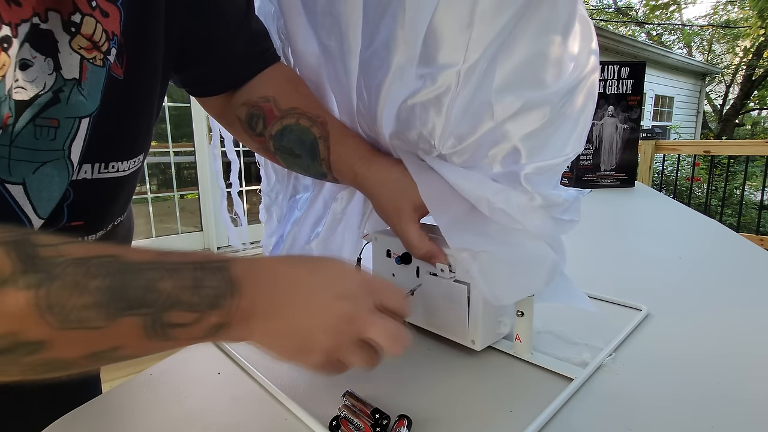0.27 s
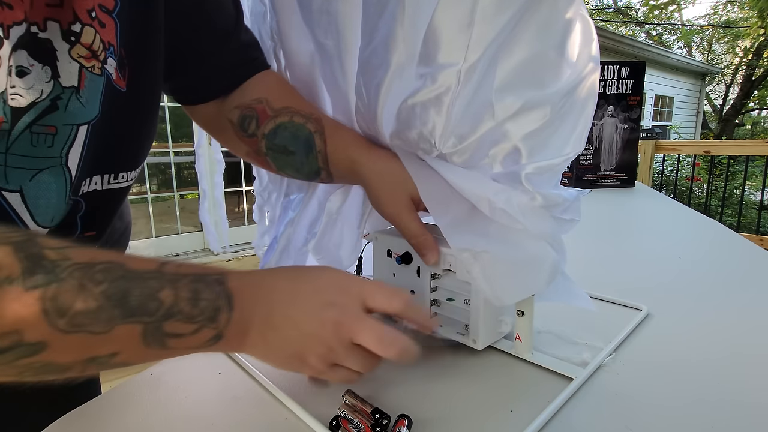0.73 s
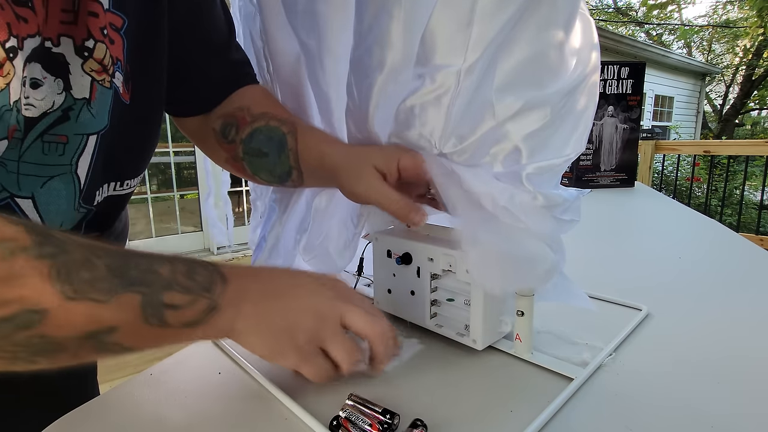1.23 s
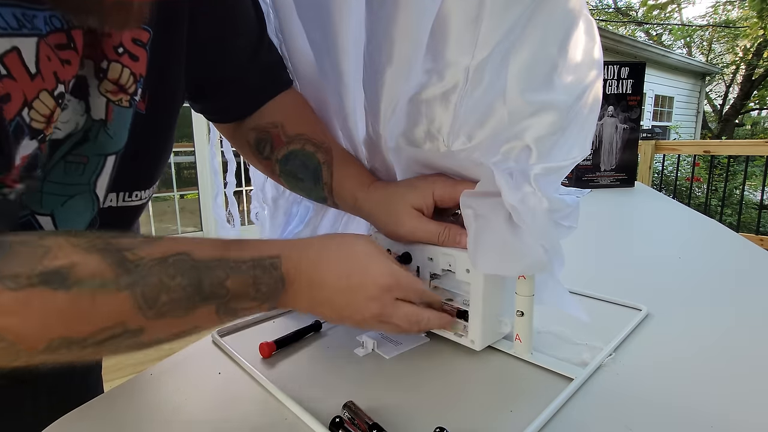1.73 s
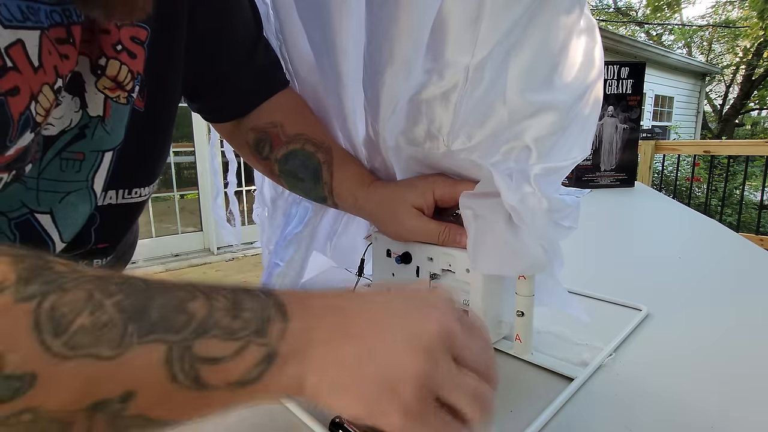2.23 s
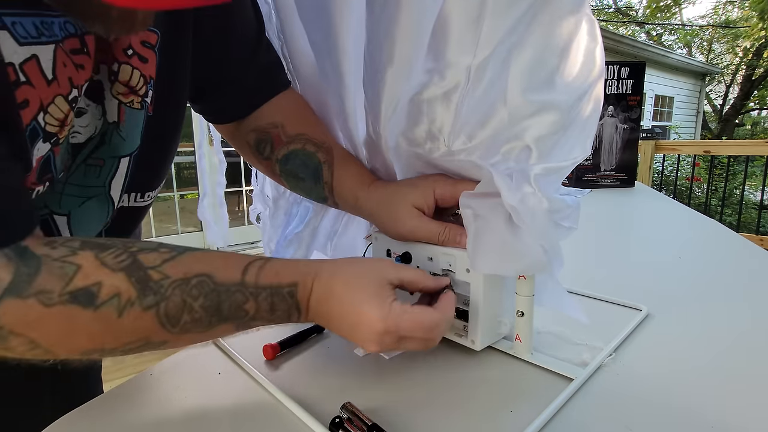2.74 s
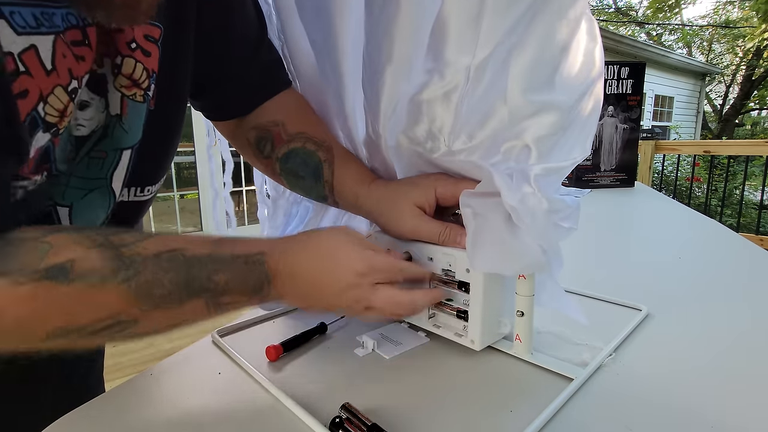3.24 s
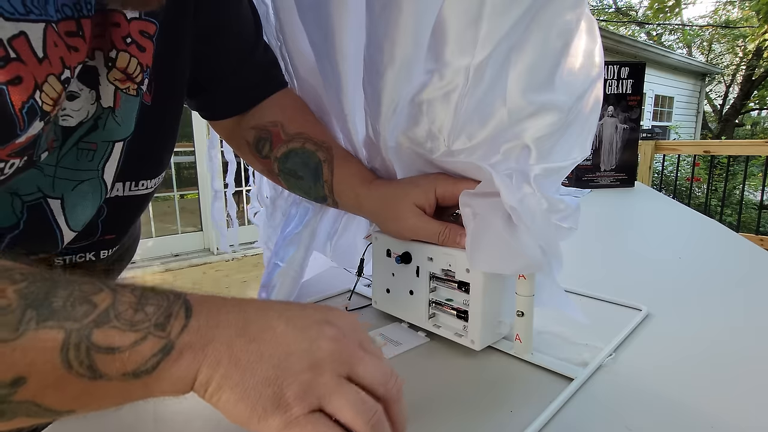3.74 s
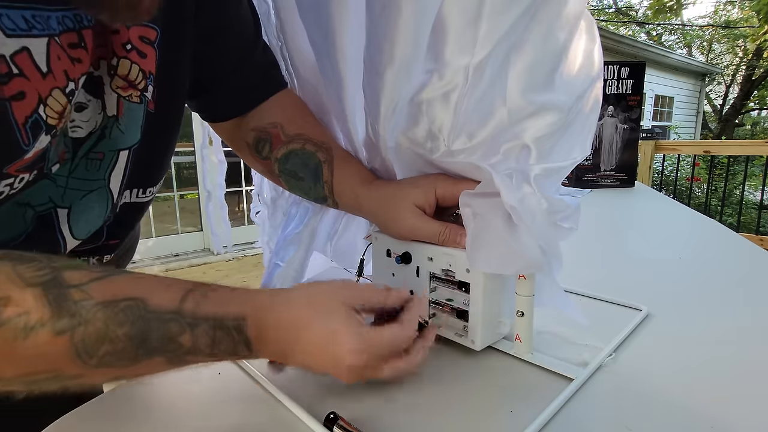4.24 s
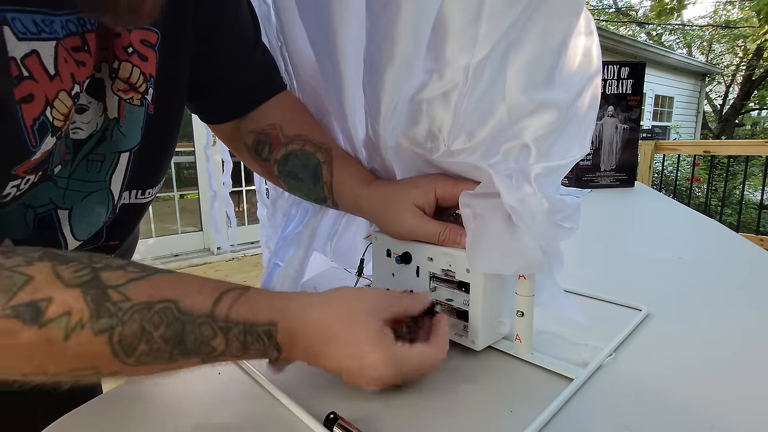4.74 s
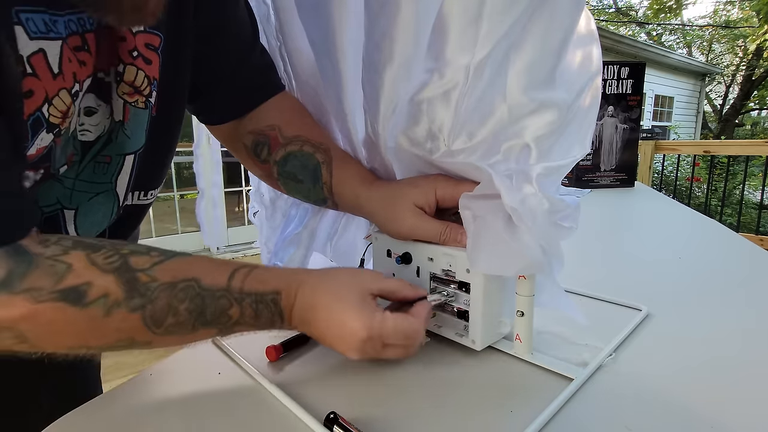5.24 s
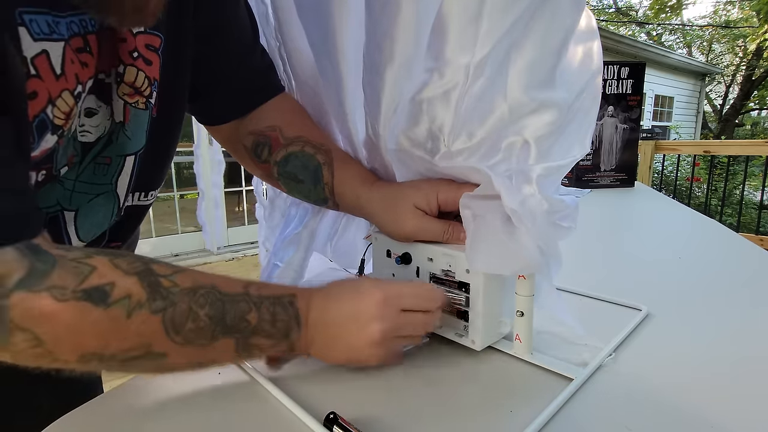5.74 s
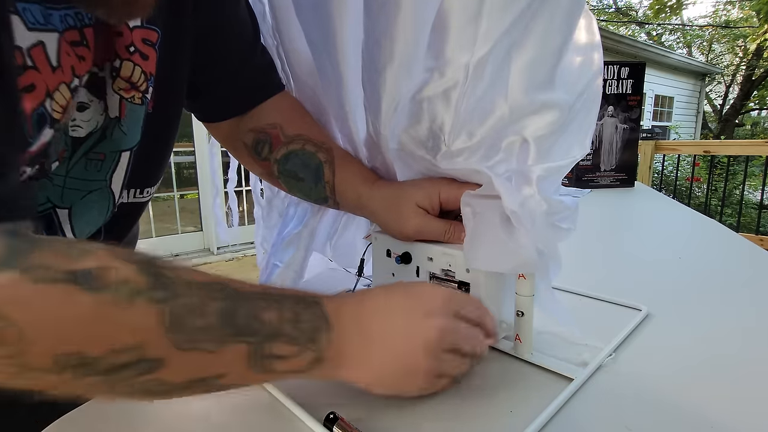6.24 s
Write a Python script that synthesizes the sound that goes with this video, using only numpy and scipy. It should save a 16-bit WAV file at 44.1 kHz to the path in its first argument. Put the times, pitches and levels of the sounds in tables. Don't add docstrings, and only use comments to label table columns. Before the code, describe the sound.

A plastic battery cover snaps off and clatters onto an outdoor table, then cells click into a hollow box over insects and faint traffic rumble.

```python
import sys
import numpy as np
from scipy import signal
from scipy.fft import rfft, irfft, next_fast_len
from scipy.io import wavfile
from scipy.ndimage import uniform_filter1d

SR = 44100
rng = np.random.default_rng(int(sys.argv[2]) if len(sys.argv) > 2 else 0)


def materialize(psi):
    bounded = np.clip(np.atleast_2d(psi).T, -1, 1)
    quanta = np.round(bounded * 32767).astype(np.int16)
    wavfile.write(sys.argv[1], SR, quanta)


def boost(x):
    u = np.asarray(x, float) / 20
    return 10 ** u


N = 285900
PADDED = next_fast_len(N)

# (time [s], level [dB])
TRAFFIC_LEVEL = [
    (0.0, -38.5),
    (1.2, -39.5),
    (2.6, -41.5),
    (4.2, -42),
    (5.6, -39.5),
    (6.48, -34),
]
# (frequency [Hz], density [dB per Hz])
TRAFFIC_SPECTRUM = [(15, -54), (25, -19), (32, -11.5), (40, -17), (50, -5.5), (65, -2), (81, -2.5),
                    (140, -18.5), (180, -60), (310, -120)]
# (frequency [Hz], density [dB per Hz])
TOWN_SPECTRUM = [(59, -46), (100, -3.5), (181, -10.5), (240, -14.5), (323, -15.5), (390, -14.5), (470, -18),
                 (533, -14.5), (1590, -22), (1830, -26), (4200, -34), (5460, -66), (9240, -120)]
# (frequency [Hz], density [dB per Hz])
INSECT_SPECTRUM = [(2350, -41), (4000, -18.5), (4290, -16.5), (4630, -4), (5110, 1), (5840, -10),
                   (6320, -4.5), (7350, -7.5), (8300, -30.5), (10800, -62), (18300, -120)]
# (frequency [Hz], density [dB per Hz])
HISS_SPECTRUM = [(4710, -11), (8000, -16), (10000, -7), (11600, -9.5), (12400, -2.5), (15100, -2.5),
                 (15800, -1), (16150, -26)]
# (frequency [Hz], correlation [-1..1])
PORT_LIKENESS = [(30, 0.3), (65, 0.5), (130, 0.95), (290, 0.48), (640, -0.45), (1410, -0.67), (3100, 0.05),
                 (15000, -0.03)]
# (frequency [Hz], left minus right [dB])
PORT_BALANCE = [(60, -4), (110, -1.5), (200, -1.5), (380, -6.5), (700, -1), (1290, -2.5), (2380, -0.5),
                (4400, -2.5), (8120, 1.5), (15000, -8.5)]
# (frequency [Hz], left lead [rad])
COVER_PHASE = [(0, 0), (860, 1.9), (2070, -0.8), (4220, -0.1), (5170, -1.5), (6980, 9.5), (10900, 22.6),
               (13400, 20.2), (15000, 7.9), (15900, 8.4)]
# (frequency [Hz], left lead [rad])
BOX_PHASE = [(0, 0), (600, 0.8), (2240, -7.4), (3880, -6.8), (4820, -8.5), (7150, -1.1), (8700, -3.5),
             (10700, -3.1), (13100, -2.8), (15900, -5.9)]
TOWN_DB, INSECT_DB, HISS_DB = -46.5, -50, -59.5

# (frequency [Hz], level [dB], t60 [s])
BOX_MODES = [(385, 4.5, 0.23), (424, -11, 0.16), (481, 4, 0.08), (534, 8.5, 0.15), (617, 17.5, 0.074),
             (660, 7, 0.16), (717, -4, 0.45)]
# (frequency [Hz], level [dB], t60 [s])
TABLE_MODES = [(133.5, -6.5, 0.48), (169.4, -0.5, 0.38), (213.6, -23, 0.42), (233.9, 3.5, 0.42),
               (244.3, -7.5, 0.45), (302, -17.5, 0.08)]
# (frequency [Hz], level [dB], t60 [s])
SHELL_MODES = [(945, -4, .045), (1105, -1, .05), (1215, -3, .04), (1390, 1, .035), (1540, 2, .03),
               (1710, 0, .04), (1845, -4, .04), (2050, -4, .035), (2320, -6, .04), (2630, -8, .04),
               (2880, -8, .04)]
# (frequency [Hz], level [dB], t60 [s])
TAB_MODES = [(3500, 9, 0.015), (3340, -15, 0.024), (3466, 27, 0.043), (4610, -40, .035), (4460, 11, 0.0032),
             (4950, -18, 0.007), (5930, 5, 0.01), (6700, 39, 0.027), (8700, -32.5, 0.02)]
# (frequency [Hz], level [dB], t60 [s])
EDGE_MODES = [(8600, -5, .008), (11000, -7, .008), (12700, 0, .012), (14000, -1, .008), (15200, 0, .008)]

# (time [s], box level [dB], box mode [Hz], table level [dB], contact [ms])
COVER_KNOCK_EVENTS = [(0.044, -20, 546, -48, 7.1), (0.187, -28.5, 710, -38.5, 26),
                      (0.318, -12, 420, -18.5, 1.3), (0.343, -23, 385, -18, 1.36),
                      (0.371, -21.5, 666, -22, 23.6), (0.63, -44, 620, -34, 4.9),
                      (0.672, -14.5, 610, -17, 12.6), (0.682, -24, 390, -43, 5.3),
                      (0.699, -22.5, 373, -26, 13), (0.736, -23, 610, -28.5, 11), (0.802, -47, 640, -49, 3),
                      (0.93, -34.5, 665, -28.5, 14), (1.006, -33, 744, -29.5, 1.4),
                      (1.1, -39, 750, -33, 6.7), (1.161, -16.5, 650, -31.5, 11)]
# (time [s], box level [dB], box mode [Hz], table level [dB], contact [ms])
CELL_KNOCK_EVENTS = [(1.68, -10.5, 620, -49, 6.7), (1.685, -10, 410, -27.5, 3.5),
                     (2.242, -32.5, 497, -30, 30), (2.804, -33.5, 655, -38.5, 3.7),
                     (2.882, -24.5, 543, -24.5, 5.7), (2.898, -33, 616, -29.5, 23),
                     (2.957, -24, 630, -30, 3.7), (3.033, -9.5, 590, -30, 8.3),
                     (3.049, -12.5, 374, -27, 3.6), (3.074, -24, 510, -41, 15),
                     (3.195, -9.5, 613, -44, 3.6), (3.207, -19, 635, -25.5, 2.9),
                     (4.871, -40, 433, -31, 10.3), (5.152, -29.5, 398, -25.5, 12.5),
                     (5.25, -29.5, 560, -39.5, 14), (5.409, -26, 420, -29, 3.45),
                     (5.507, -33, 687, -61, 5.9), (5.727, -24.5, 610, -60, 3.9),
                     (5.809, -23, 584, -26, 2.8), (5.829, -22.5, 616, -30.5, 4),
                     (5.868, -18, 630, -39, 1.2), (5.884, -22.5, 700, -30, 15),
                     (6.03, -26.5, 715, -39, 5.6), (6.153, -13.5, 692, -25.5, 3.95)]
# (from [s], to [s])
HAND_RESTS = [
    (0.33, 0.65),
    (0.9, 1.6),
    (2.2, 2.3),
    (4.8, 4.9),
]
HAND_ON_TABLE_HZ, COVER_ON_TABLE_HZ, BOX_ON_TABLE_HZ = 127.4, 197, 248
COVER_OFF_S, TABLE_LAG_S = 1.6, 0.00565

# (time [s], shell level [dB], struck spot [Hz], tabs level [dB], edge level [dB])
COVER_CLICK_EVENTS = [(0.046, -16.5, 1890, -21.5, -29), (0.188, -34.5, 1610, -34, -33.5),
                      (0.3188, -6, 1200, -5, -5.5), (0.323, -16.5, 1830, -11, -30),
                      (0.3317, -14.5, 1750, -11, -18.5), (0.3701, -15, 1550, -17, -23),
                      (0.383, -19.5, 1610, -27, -35), (0.631, -27.5, 1210, -54, -47.5),
                      (0.6719, -10, 1050, -19.5, -30), (0.6805, -12, 970, -9, -19),
                      (0.7022, -23.5, 2090, -35, -62.5), (0.736, -20, 1350, -18.5, -38),
                      (0.7603, -30, 1050, -38, -60), (0.8043, -29, 1740, -21, -22),
                      (0.8613, -45, 1370, -50, -45.5), (0.933, -15.5, 1370, -11.5, -8.5),
                      (1.0071, -22, 2660, -21.5, -23.5), (1.017, -36, 2940, -43, -30),
                      (1.033, -32, 2700, -32, -48), (1.1037, -22, 1810, -23, -26),
                      (1.133, -35, 2900, -36, -38), (1.1398, -25.5, 2880, -25.5, -55),
                      (1.149, -27, 3040, -33, -31), (1.1626, -15.5, 1210, -8.5, -9.5),
                      (1.432, -38, 2850, -38, -32.5), (1.4377, -39.5, 1190, -38.5, -47.5)]
# (time [s], shell level [dB], struck spot [Hz], tabs level [dB], edge level [dB])
CELL_CLICK_EVENTS = [(1.6806, -1.5, 1175, -15.5, -14), (1.766, -41, 1660, -42, -62),
                     (1.786, -40, 1060, -41, -41.5), (2.242, -43, 1160, -36, -63),
                     (2.249, -32, 1010, -45, -58), (2.269, -39.5, 1020, -55, -62),
                     (2.882, -39, 1310, -45, -49), (2.959, -32, 1160, -32, -45),
                     (3.0357, -22, 1280, -34, -32), (3.042, -18, 1360, -34, -36),
                     (3.071, -27, 1160, -49, -55), (3.1942, -3, 1215, -12.5, -17),
                     (3.262, -41.5, 1350, -39.5, -47), (5.1515, -45, 1120, -51, -67),
                     (5.216, -52, 2470, -38, -54), (5.247, -30.5, 2450, -23, -30),
                     (5.3133, -43.5, 2970, -41.5, -74), (5.4083, -24, 1180, -42, -48.5),
                     (5.507, -32.5, 1710, -45, -51), (5.7265, -40, 1140, -58, -63),
                     (5.757, -52, 1200, -58, -65), (5.808, -35, 1130, -52, -72),
                     (5.846, -26, 1570, -48, -36), (5.8665, -14.5, 1600, -29.5, -49),
                     (5.944, -20.5, 2740, -10.5, -14.5), (5.957, -52, 2800, -39, -44),
                     (6.0302, -21.5, 2370, -30.5, -53), (6.153, -7, 1460, -20, -25),
                     (6.196, -33, 1160, -46, -47)]
SHELL_CONTACT_MS, TAB_CONTACT_MS, SOFTER_MS_PER_DB = 2.65, 4.25, 0.38
BIG_TAB_HZ, SPRING_HZ, FAINT_BELOW_DB = 3450, 4880, -30.5

# (start [s], length [s], dull level [dB], middle level [dB], bright level [dB])
SLIDE_STROKES = [(0.307, 0.1, -25, -25, -26.5), (0.044, 0.069, -35.5, -37.5, -52),
                 (0.186, 0.023, -35, -27.5, -27.5), (0.378, 0.054, -25.5, -37, -45),
                 (0.614, 0.16, -36, -43, -49), (0.672, 0.12, -25, -34, -42), (0.716, 0.23, -37, -40, -59),
                 (0.793, 0.066, -38.5, -53, -39), (0.937, 0.13, -43, -36.5, -35),
                 (1, 0.11, -36.5, -36, -39), (1.103, 0.1, -32, -32.5, -45),
                 (1.151, 0.21, -37.5, -38.5, -43), (1.176, 0.21, -35.5, -45.5, -51),
                 (1.27, 0.21, -40.5, -39.5, -42), (1.352, 0.68, -46, -50.5, -59),
                 (1.673, 0.13, -31.5, -44, -43), (1.828, 0.12, -44.5, -48, -50),
                 (2.237, 0.069, -33, -44, -50), (2.875, 0.07, -37.5, -44, -51),
                 (2.942, 0.073, -37.5, -45, -56), (3.002, 0.07, -44, -47, -61),
                 (3.026, 0.034, -15.5, -47, -28.5), (3.044, 0.11, -32, -45.5, -51),
                 (3.175, 0.037, -61, -50, -54), (3.209, 0.095, -37, -38.5, -42),
                 (3.264, 0.2, -47, -53, -50), (4.43, 0.074, -62, -61, -52), (5.136, 0.041, -44, -48, -58),
                 (5.188, .05, -41, -51, -51), (5.47, 0.098, -38.5, -44, -50), (5.533, 0.29, -42, -56, -52),
                 (5.735, 0.11, -40, -53, -68), (5.786, 0.13, -34, -43, -50.5),
                 (5.878, 0.074, -38, -42.5, -54), (5.931, 0.07, -31.5, -44, -32),
                 (5.997, 0.2, -60, -46.5, -41), (6.16, 0.1, -36.5, -39, -48.5),
                 (6.285, 0.14, -46, -50, -51)]
# (frequency [Hz], width [Hz], level [dB])
RUBBED_PARTS = [
    [(262, 130, -3), (407, 74, 0.5), (610, 152, 1.5), (870, 790, -6.5), (1210, 108, -2), (1570, 340, -21.5)],
    [(2050, 330, 4), (2700, 500, 2), (3450, 690, 5), (4430, 1900, -1.5), (6750, 1480, -2.5),
     (7300, 850, -0.5)],
    [(9900, 1800, -2), (11300, 1500, -0.5), (12500, 1200, 3.5), (14100, 1900, 0.5), (15200, 1500, -2)],
]
STROKE_RISE_SHARE, STROKE_FADE_DB = 0.21, 21.5

# (time [s], frequency [Hz], level [dB], t60 [s])
PART_TWANGS = [(0.372, 1390, -40.5, 0.39), (0.32, 5450, -2.5, 0.025), (0.322, 1800, -8, 0.041),
               (0.338, 640, -15, 0.043), (0.371, 2850, -17, .04), (0.702, 1000, -17, 0.043),
               (0.804, 3500, -31, 0.026), (0.806, 2070, -27, 0.072), (1.164, 4410, -17, 0.036),
               (1.377, 3150, -30, .03), (1.682, 1470, -9, 0.038), (3.196, 3250, -17, .04),
               (0.047, 3320, -15.5, .03), (1.705, 400, -27, .2), (2.96, 2920, -35, .05),
               (3.255, 680, -41.5, 0.54), (5.729, 2400, -35, .02), (5.756, 1300, -38, .03),
               (5.823, 2350, -32, .03), (5.868, 3600, -25, 0.032), (5.879, 1650, -32, 0.036),
               (5.9445, 3730, -8.5, 0.033), (0.69, 3400, -28, 0.28), (0.632, 3000, -45, 0.11),
               (0.9342, 1706, -6, 0.057), (1.008, 2880, -29, 0.16), (1.105, 1710, -18, 0.057),
               (1.684, 1695, -6.5, 0.034), (1.682, 2770, -18, 0.044), (2.243, 4030, -28.5, 0.04),
               (2.251, 4100, -35, .04), (3.197, 2022, -8, 0.036), (5.797, 2490, -35, .06),
               (5.811, 2300, -34, 0.054), (5.83, 2400, -35, .06), (6.157, 3400, -25, .03),
               (3.225, 1370, -41, 0.42), (5.867, 1640, -12, 0.05), (5.945, 2890, -15.5, 0.055),
               (0.047, 2410, -13.5, 0.018), (0.0475, 2880, -12, 0.01), (0.2, 706, -33, 0.1),
               (0.672, 420, -13, 0.025), (0.672, 3450, -10, 0.029), (0.681, 3450, -4, 0.025),
               (0.7, 710, -17, .04), (0.724, 830, -17, 0.045), (0.738, 3450, -10.5, 0.02),
               (0.74, 610, -27, 0.047), (0.9339, 3340, -7.5, 0.031), (0.933, 4260, -17, 0.037),
               (1.684, 403.5, -7.5, 0.08), (1.69, 201, -20.5, 0.14), (0.674, 280, -11.5, 0.041),
               (3.196, 2900, -14, 0.044), (1.682, 618, -13, 0.071), (2.879, 584, -23.5, 0.095),
               (2.957, 625, -19, 0.076), (3.206, 679, -8, 0.06), (5.248, 4610, -23, 0.029),
               (5.248, 2470, -28.5, 0.052), (5.408, 250, -28, 0.11), (5.4098, 593, -12, 0.031),
               (5.421, 550, -16.5, 0.039), (5.41, 3570, -31, .03), (5.509, 2840, -31.5, 0.034),
               (5.809, 610, -16.5, 0.05), (5.822, 590, -20.5, .06), (5.847, 603, -21, 0.056),
               (5.8675, 706, -9.5, 0.046), (5.867, 2450, -12.5, 0.022), (5.879, 636, -22.5, 0.07),
               (5.903, 650, -29, .07), (6.03, 2490, -16, 0.023), (6.154, 673, -20, 0.057),
               (6.154, 1150, -6.5, 0.024), (6.1545, 2050, -14.5, 0.045), (2.882, 2840, -40, 0.091)]
# (time [s], frequency [Hz], level [dB])
DRAG_TRACKS = [
    [(1.185, 3804, -46), (1.27, 3600, -48), (1.305, 3680, -42), (1.34, 3260, -39), (1.38, 3100, -44),
     (1.425, 2900, -55)],
    [(1.2, 1250, -46), (1.28, 1300, -40.5), (1.335, 1448, -49), (1.41, 900, -42.5)],
    [(5.953, 3800, -38), (6.0, 3330, -52)],
    [(6.045, 3750, -52.5), (6.07, 3680, -48), (6.11, 3550, -50)],
]


def rms_one(x):
    return x / np.sqrt(np.mean(x ** 2) + 1e-20)


def at_hz(points, hz):
    f, v = np.transpose(points)
    return np.interp(np.log(hz + 1), np.log(f + 1), v)


def drifting_gain(spread_db, rate_hz):
    knots = boost(spread_db * rng.standard_normal(N // 100))
    return np.interp(np.arange(N) / SR * rate_hz * 2, np.arange(len(knots)), knots)


def field(spectrum, flicker_db, rate_hz):
    hz = np.fft.rfftfreq(PADDED, 1 / SR)
    mid, side = rfft(rng.standard_normal((2, PADDED))) * boost(at_hz(spectrum, hz))
    alike = np.clip(at_hz(PORT_LIKENESS, hz), -1, 1)
    pair = np.sqrt(1 + alike) * mid + np.sqrt(1 - alike) * side * [[1], [-1]]
    pair *= boost(at_hz(PORT_BALANCE, hz) / 2 * np.array([[1], [-1]]))
    noise = irfft(pair, PADDED)[:, :N]
    return rms_one(noise * drifting_gain(flicker_db, rate_hz))


def outdoors():
    traffic_db = np.interp(np.arange(N) / SR, *np.transpose(TRAFFIC_LEVEL))
    traffic = boost(traffic_db) * field(TRAFFIC_SPECTRUM, flicker_db=0.5, rate_hz=5.0)
    town = boost(TOWN_DB) * field(TOWN_SPECTRUM, flicker_db=0.4, rate_hz=3.0)
    insects = boost(INSECT_DB) * field(INSECT_SPECTRUM, flicker_db=1.0, rate_hz=140.0)
    hiss = boost(HISS_DB) * field(HISS_SPECTRUM, flicker_db=0.8, rate_hz=6.0)
    return traffic + town + insects + hiss


def strikes(at_s, peak_db, contact_ms, modes, favoured_hz, spot_db, spot_t60, crack_db, crack_ms):
    hz, level_db, t60 = np.transpose(modes)[:, :, None]
    lowest_hz = hz.min()
    length = SR // (5 if lowest_hz < 300 else 7 if lowest_hz < 600 else 11)
    early = SR // 40
    t = np.arange(length) / SR
    since_ms = (t - early / SR) * 1000
    band_hz = [lowest_hz, min(hz.max() * 0.97, 17000)]
    band = signal.butter(2, band_hz, "band", fs=SR, output="sos")
    no_bass = signal.butter(2, lowest_hz * 0.7, "high", fs=SR, output="sos")
    out = np.zeros(N + length + early)
    for s, db, ms, near_hz in zip(at_s, peak_db, contact_ms, favoured_hz):
        part = np.maximum(since_ms, 0) / max(ms, 0.3)
        rise = 1 - np.exp(-part / 0.058)
        uneven = boost(6.96 * rng.standard_normal(length))
        chatter = rng.standard_normal(length) * uneven * rise * np.exp(-part ** 2)
        chatter = chatter[:3 * early]
        grip = rng.standard_normal((3, len(hz), 1)) * [[[0.01]], [[3]], [[0.25]]]
        away_db = 13.3 * np.abs(np.log2(hz / near_hz))
        decay_db = 60 * t / t60 * np.exp(np.abs(grip[2]))
        rings = np.sin(2 * np.pi * hz * (1 + grip[0]) * t)
        rings = rings * boost(level_db + grip[1] - away_db - decay_db)
        spot = np.sin(2 * np.pi * near_hz * t) * boost(spot_db - 60 * t / spot_t60)
        turn = np.exp(2j * np.pi * near_hz * t[:len(chatter)])
        spot *= np.linalg.norm(chatter) / np.abs(chatter @ turn)
        body = signal.fftconvolve(chatter, rings.sum(axis=0) + spot)[:length]
        lead_in = boost(-26) * np.exp(-np.abs(since_ms) / 5.8)
        burst = rise * np.exp(-since_ms / (crack_ms + ms / 2))
        crack = signal.sosfilt(band, rng.standard_normal(length) * (lead_in + burst))
        crack += 0.59 * signal.lfilter(*signal.iirpeak(near_hz, 1.3, SR), crack)
        hit = rms_one(body) + boost(crack_db) * rms_one(crack)
        hit = signal.sosfilt(no_bass, hit)
        loudest = np.sqrt(uniform_filter1d(hit ** 2, size=200).max())
        out[round(s * SR):][:length] += boost(db) * hit / loudest
    return out[early:early + N]


def knocks():
    s, db, hz, table_db, ms = np.transpose(COVER_KNOCK_EVENTS + CELL_KNOCK_EVENTS)
    hand_rests = sum((s > a) & (s < b) for a, b in HAND_RESTS)
    laden_hz = np.where(s < COVER_OFF_S, COVER_ON_TABLE_HZ, BOX_ON_TABLE_HZ)
    table_hz = np.where(hand_rests, HAND_ON_TABLE_HZ, laden_hz)
    box = strikes(s, db - 0.1, ms, BOX_MODES, hz,
                  spot_db=17.5, spot_t60=0.04, crack_db=-6.0, crack_ms=13.0)
    table = strikes(s + TABLE_LAG_S, table_db + 3.0, ms, TABLE_MODES, table_hz,
                    spot_db=7.5, spot_t60=0.12, crack_db=-23, crack_ms=7.6)
    return box + table


def stroke_pressure(part):
    out = np.zeros(N + SR)
    for start_s, length_s, *top_db in SLIDE_STROKES:
        done = np.linspace(0, 1, round(length_s * SR))
        swell = np.clip(done / STROKE_RISE_SHARE, 0, 1) * np.clip((1 - done) * 10, 0, 1)
        fade_db = STROKE_FADE_DB * np.clip(done - STROKE_RISE_SHARE, 0, 1)
        out[round(start_s * SR):][:len(done)] += swell * boost(top_db[part] - fade_db)
    return out[:N]


def slides(slips_per_s=3000, uneven_db=4.0):
    out = np.zeros(N)
    slips = (rng.random(N) < slips_per_s / SR) * rng.choice([-1, 1], N)
    slips = slips * boost(uneven_db * np.minimum(rng.exponential(1, N), 4))
    slips = slips * drifting_gain(spread_db=2.5, rate_hz=45.0) + 1e-18
    for part, modes in enumerate(RUBBED_PARTS):
        rubbed = np.zeros(N)
        for j, (hz, width_hz, level_db) in enumerate(modes):
            touch = slips * drifting_gain(spread_db=1.8, rate_hz=20.0) * boost(level_db) * (-1) ** j
            rubbed += signal.lfilter(*signal.iirpeak(hz, hz / width_hz, SR), touch)
        out += rms_one(rubbed) * stroke_pressure(part)
    return out


def clicks():
    s, db, hz, tabs_db, edge_db = np.transpose(COVER_CLICK_EVENTS + CELL_CLICK_EVENTS)
    longer_ms = SOFTER_MS_PER_DB * np.maximum(-21.5 - np.maximum(db, tabs_db), 0)
    tab_hz = np.where(tabs_db < FAINT_BELOW_DB, SPRING_HZ, BIG_TAB_HZ)
    edge_hz = np.full(len(s), 14000.0)
    shell = strikes(s, db - 0.1, SHELL_CONTACT_MS + longer_ms, SHELL_MODES, hz,
                    spot_db=23.5, spot_t60=0.015, crack_db=-3.5, crack_ms=2.9)
    tabs = strikes(s, tabs_db - 0.1, TAB_CONTACT_MS + longer_ms, TAB_MODES, tab_hz,
                   spot_db=20.0, spot_t60=0.022, crack_db=10.0, crack_ms=0.74)
    edge = strikes(s, edge_db + 4.0, TAB_CONTACT_MS * 0.8 + longer_ms, EDGE_MODES, edge_hz,
                   spot_db=-9, spot_t60=0.01, crack_db=5, crack_ms=1.2)
    return shell + tabs + edge


def twangs():
    out = np.zeros(N + SR)
    t = np.arange(SR // 2) / SR
    for s, hz, db, t60 in PART_TWANGS:
        turn = 2 * np.pi * hz * t
        cluster = np.sin(turn) + 0.4 * np.sin(turn * 1.02) + hz / 6000 * np.sin(turn * 0.953)
        attack = np.minimum(t / 0.0012, 1)
        out[round(s * SR):][:len(t)] += cluster * boost(db - 60 * t / t60) * attack
    return out[:N]


def drag(width_hz=160):
    t = np.arange(N) / SR
    out = np.zeros(N)
    lowpass = signal.butter(2, width_hz, fs=SR)
    flutter = rms_one(signal.lfilter(*lowpass, rng.standard_normal((2, N))))
    for s, hz, db in map(np.transpose, DRAG_TRACKS):
        turn = 2 * np.pi * np.cumsum(np.interp(t, s, hz)) / SR
        fade = np.clip(np.minimum(t - s[0], s[-1] - t) / 0.008, 0, 1)
        level = fade * np.interp(t, s, boost(db))
        out += level * (flutter[0] * np.cos(turn) + flutter[1] * np.sin(turn))
    return out * drifting_gain(spread_db=2.5, rate_hz=60)


def two_ports(x, lead):
    hz = np.fft.rfftfreq(PADDED, 1 / SR)
    f, radians = np.transpose(lead)
    in_step = np.clip(hz / 1000, 0, 1)
    swing = np.tanh(10.0 * np.sin(np.interp(hz, f, radians)))
    phase = in_step * (1.164 + hz / 30000) * swing
    half = np.exp(0.5j * phase) * boost(at_hz(PORT_BALANCE, hz) / 2)
    return irfft(rfft(x, PADDED) * np.array([half, 1 / half]), PADDED)[:, :N]


def table_echoes(x, level_db=-15, t60=0.059):
    t = np.arange(SR // 6) / SR
    tail = rng.standard_normal((2, len(t))) * boost(-60 * t / t60) * (t > 0.0015)
    tail = signal.lfilter([1, -1], np.convolve([1, -0.6], [1, -0.95]), tail)
    tail = tail / np.sqrt((tail ** 2).sum(axis=1, keepdims=True))
    return boost(level_db) * signal.fftconvolve(x[None], tail, axes=1)[:, :N]


def scene():
    near = knocks() + slides() + clicks() + twangs() + drag()
    near = signal.lfilter(*signal.butter(2, 110, "high", fs=SR), near)
    near = near - 0.5 * signal.lfilter(*signal.iirpeak(10000, 3, SR), near)
    cover = np.arange(N) < COVER_OFF_S * SR
    direct = two_ports(near * cover, COVER_PHASE) + two_ports(near * ~cover, BOX_PHASE)
    return boost(-4.5) * direct + table_echoes(near) + outdoors()


def low_pass(x):
    return signal.sosfilt(signal.butter(12, 16380, fs=SR, output="sos"), x)


def record(dry):
    clipped = dry / (1 + np.abs(dry) ** 4) ** 0.25
    top_cut = signal.cheby2(10, 30, 16600, fs=SR, output="sos")
    mix = signal.sosfilt(top_cut, clipped)
    return low_pass(mix)


dry = scene()
out = record(dry)
materialize(out)
```